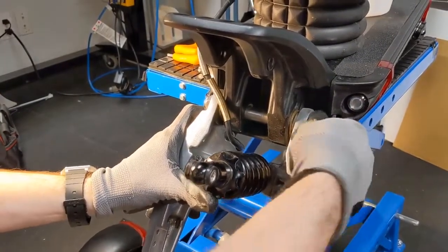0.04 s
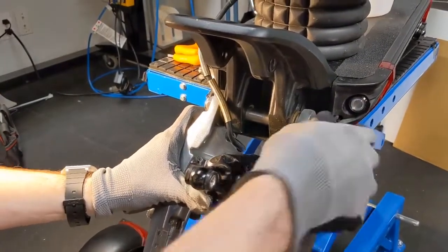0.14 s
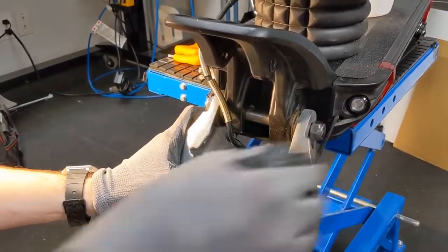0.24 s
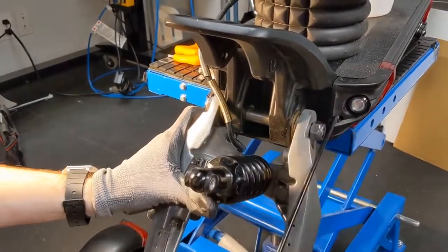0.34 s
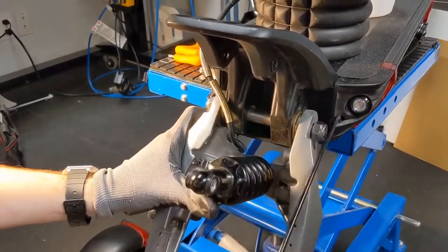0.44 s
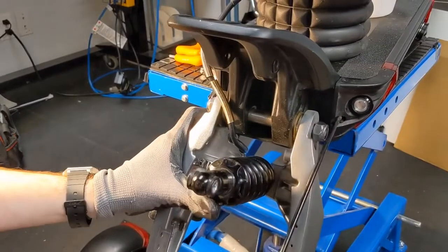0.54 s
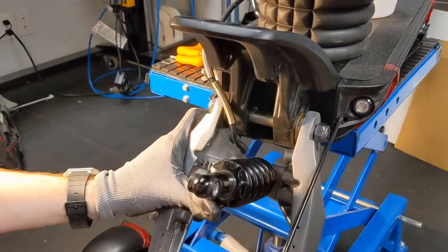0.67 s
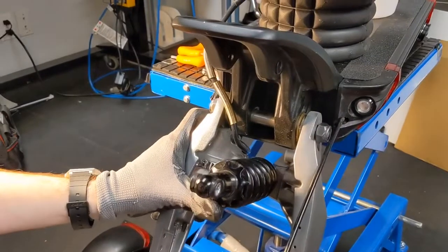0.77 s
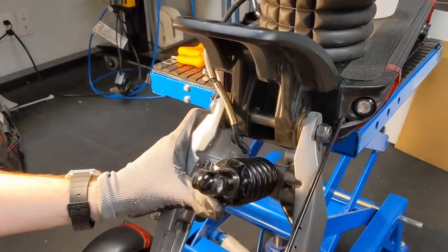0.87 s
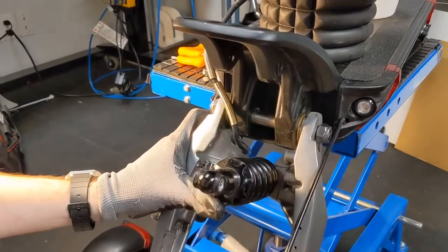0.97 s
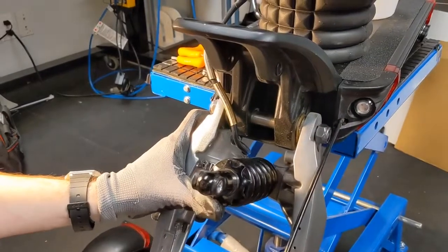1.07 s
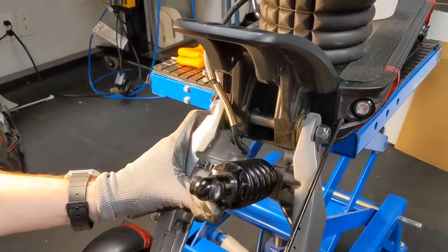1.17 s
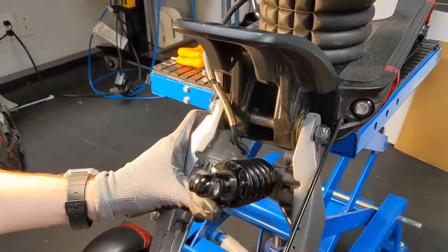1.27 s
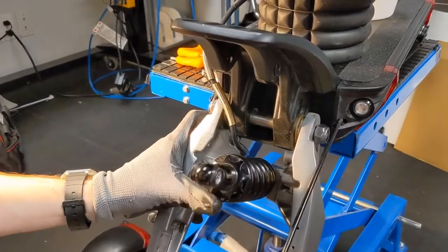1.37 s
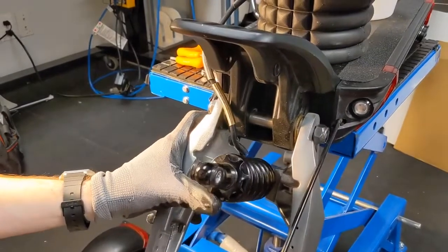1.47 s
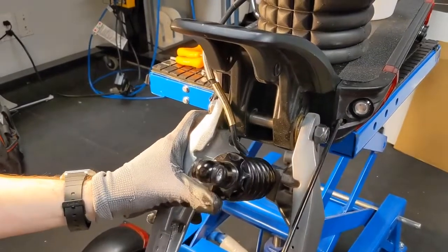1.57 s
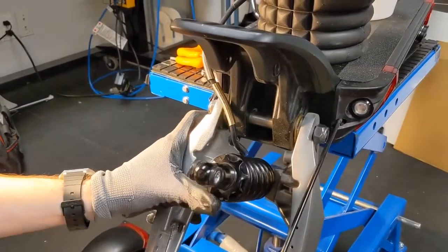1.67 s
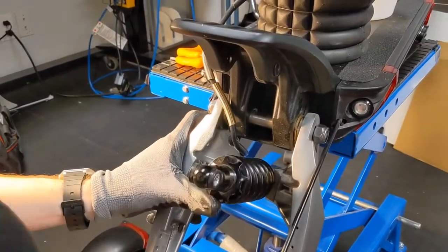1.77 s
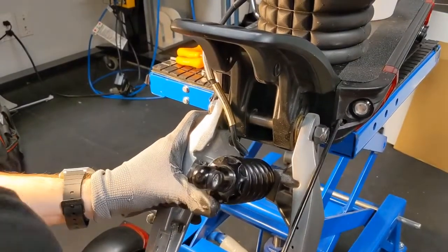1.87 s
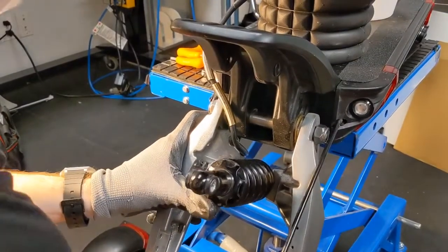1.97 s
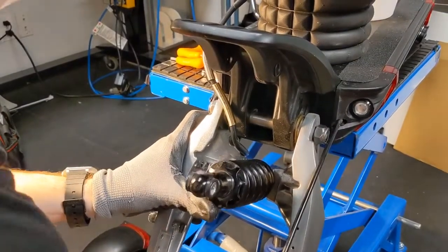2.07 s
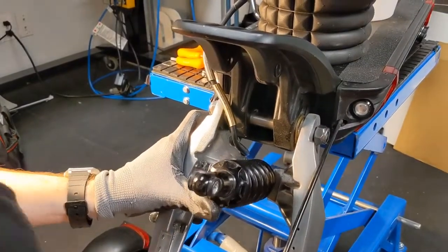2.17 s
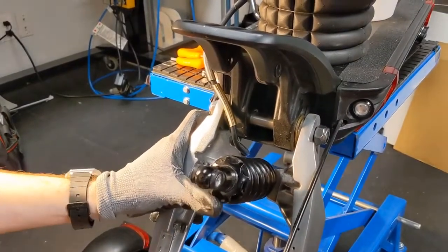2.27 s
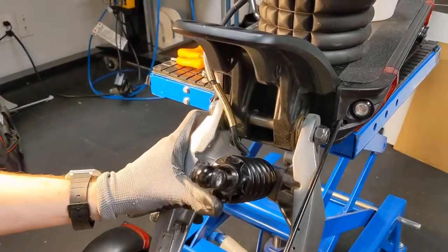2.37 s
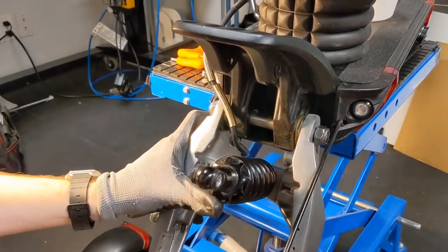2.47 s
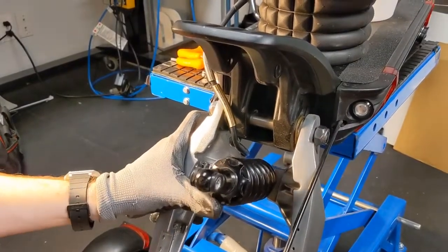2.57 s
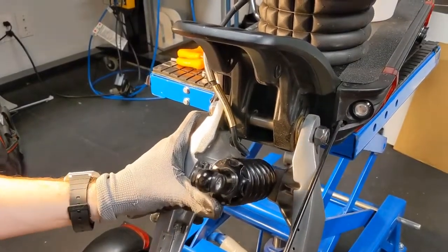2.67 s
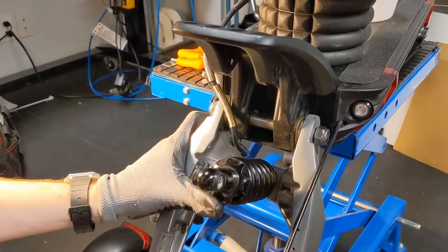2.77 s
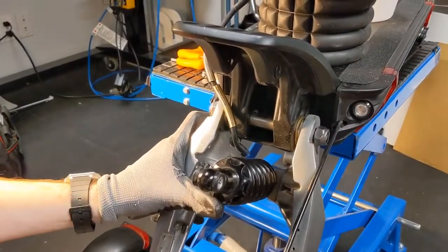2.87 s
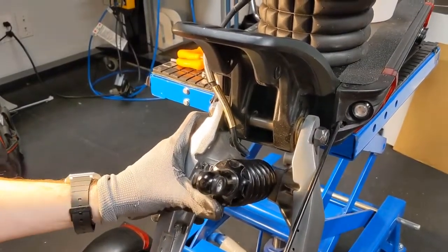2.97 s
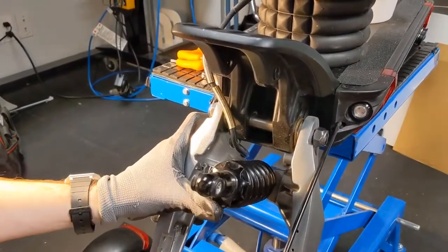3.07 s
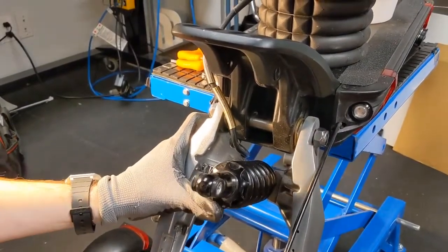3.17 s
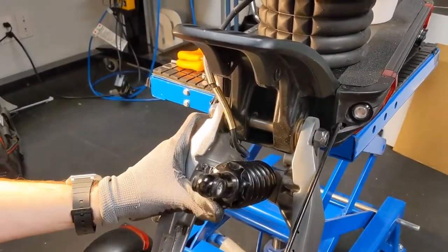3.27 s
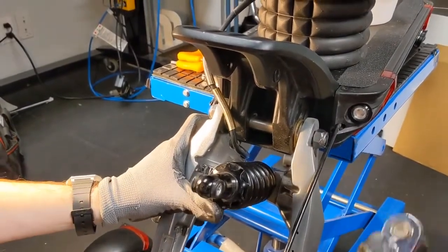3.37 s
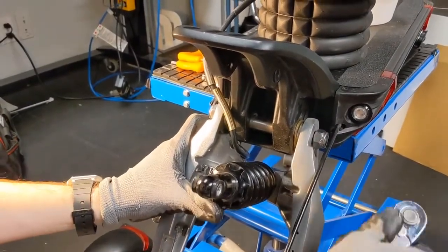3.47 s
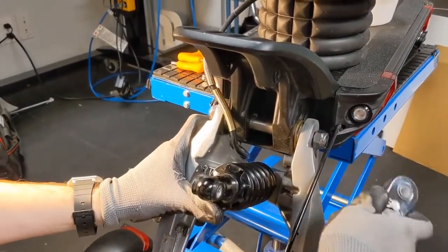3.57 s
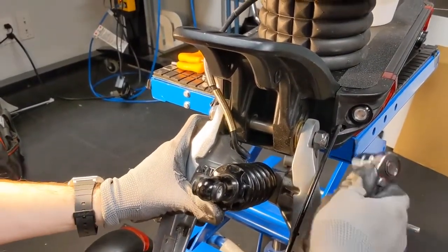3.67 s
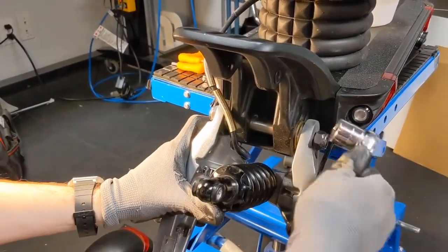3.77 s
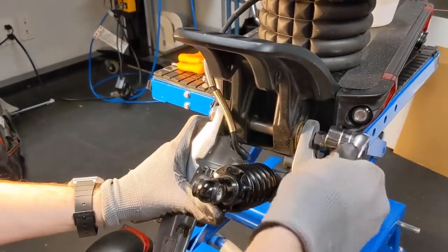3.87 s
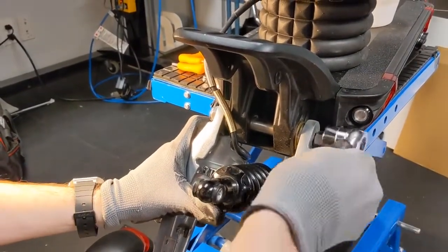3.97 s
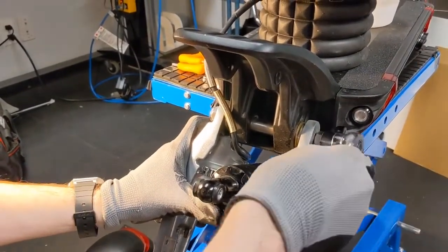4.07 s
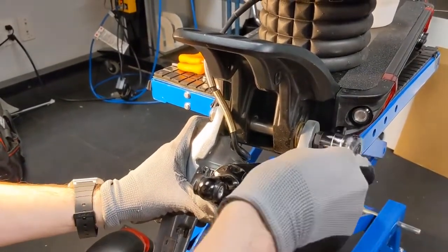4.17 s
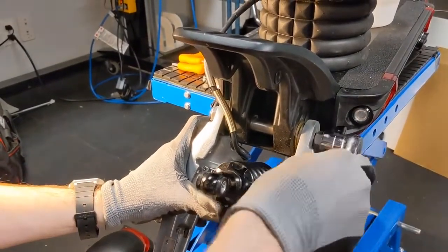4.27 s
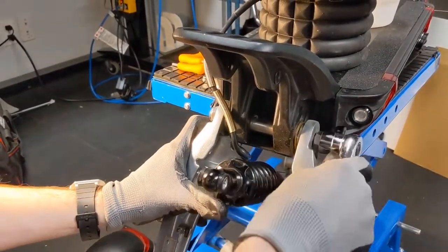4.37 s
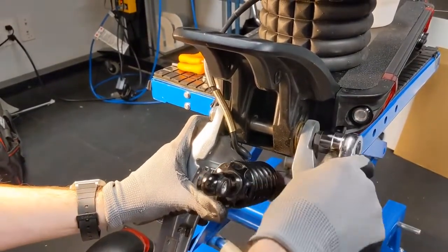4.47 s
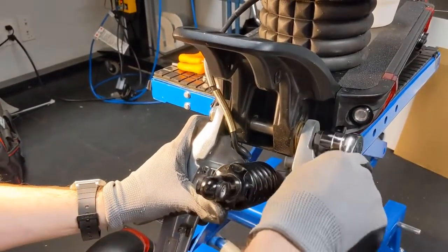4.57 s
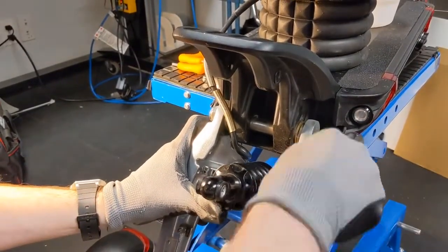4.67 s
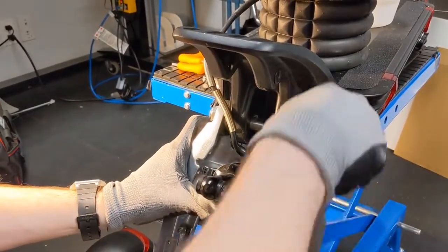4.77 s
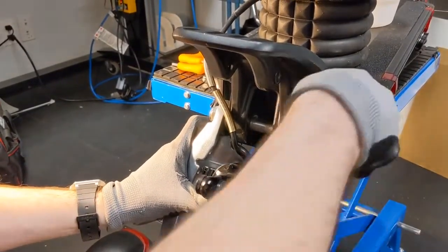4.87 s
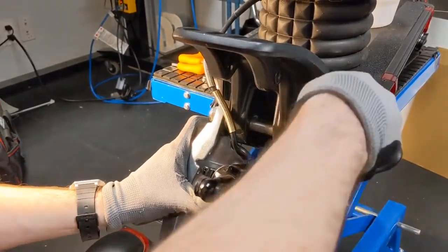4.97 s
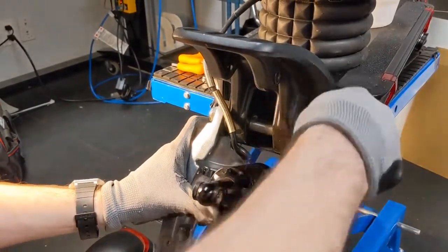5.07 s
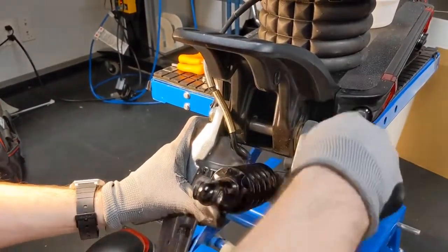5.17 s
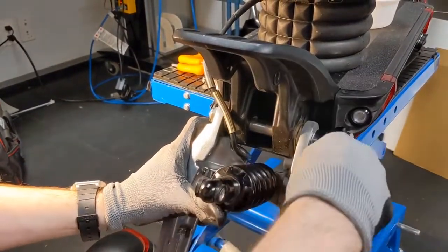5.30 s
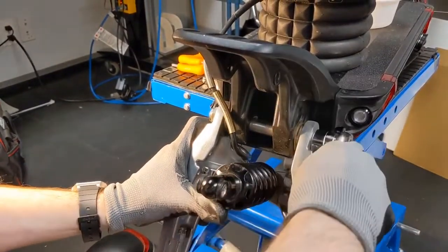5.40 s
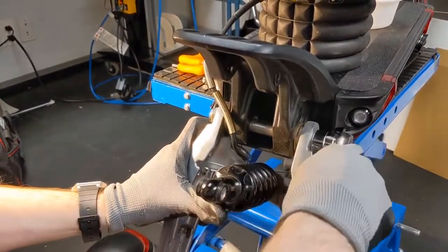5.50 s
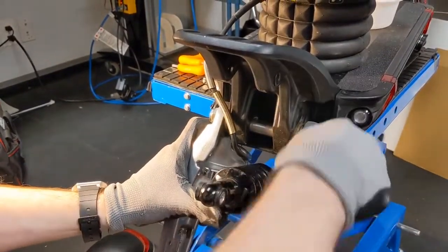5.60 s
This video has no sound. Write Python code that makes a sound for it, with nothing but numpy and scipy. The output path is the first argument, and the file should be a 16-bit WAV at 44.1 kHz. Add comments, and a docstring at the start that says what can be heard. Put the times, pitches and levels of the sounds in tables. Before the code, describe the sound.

A workshop fan hums low and steady throughout. For the first half, knitted gloves rub softly, a sleeve swishes once, and parts knock faintly in the hand, with a crisp ratchet tick at about two seconds. Then a socket lands on a nut with a bright snap, followed by uneven clusters of clicks, steel clacks, short scrapes and rattles. Close stereo pickup in a lightly reverberant room.

```python
"""Throughout, a workshop fan hums as a few wavering sinusoids over the filtered noise of room air.
First gloves and a sleeve rustle as swelling noise, and parts in the hand knock softly as resonant bursts.
A socket ratchet ticks, then lands on a nut of a steel frame: a noisy snap and a few damped modes.
It is worked round: bursts and ringing modes click and clack, and random slips scrape, rattle and jostle steel.
The walls answer all but the fan, by convolution with decaying noise."""
import sys
import numpy as np
from scipy import signal
from scipy.fft import rfft, irfft, next_fast_len
from scipy.io import wavfile
from scipy.ndimage import map_coordinates

SR = 44100
rng = np.random.default_rng(int(sys.argv[2]) if len(sys.argv) > 2 else 0)


def inscribe(sig):
    """Save sig as 16-bit PCM at rate SR to the path in sys.argv[1].

    A 1-D sig is mono; a 2-D sig holds one channel per row.
    Samples are clipped to [-1, 1] before scaling.
    """
    pcm = np.round(np.clip(np.atleast_2d(sig).T, -1, 1) * 32767)
    wavfile.write(sys.argv[1], SR, pcm.astype(np.int16))


N = 248724
TOP_HZ = 15650  # upper limit of the band


def amp(db):
    """Level in decibels as an amplitude ratio."""
    return 10 ** (np.asarray(db) / 20)


def unit(x):
    """Normalisation to an rms of 1."""
    return x / np.sqrt(np.mean(x ** 2) + 1e-20)


def fade(t, t60):
    """Exponential decay, 60 dB down at t60."""
    return np.exp(-np.log(1000) * t / max(t60, 1e-4))


def along(points, hz):
    """Interpolation of (frequency_hz, value) points on a logarithmic frequency axis."""
    point_hz, values = np.transpose(points)
    return np.interp(np.log(hz + 1), np.log(point_hz), values)


def wobble(rate, size=N):
    """Smooth random modulation: a spline through random knots, rate of them a second."""
    knots = rng.standard_normal(int(size * rate / SR) + 4)
    return map_coordinates(knots, [np.arange(size) * rate / SR])


def filtered(x, response):
    """Linear filtering: the spectrum of x times a response of frequency."""
    m = next_fast_len(N + SR // 2)
    spectrum = rfft(x, m) * response(np.fft.rfftfreq(m, 1 / SR))
    return irfft(spectrum, m)[..., :N]


def impulse(gain_db, size=1024):
    """Minimum phase: folding the cepstrum gives the causal pulse of a given spectrum."""
    cepstrum = irfft(gain_db(np.fft.rfftfreq(size, 1 / SR)) * np.log(10) / 20)
    cepstrum[1:size // 2] *= 2
    cepstrum[size // 2 + 1:] = 0
    return irfft(np.exp(rfft(cepstrum)))


def mid_side(hz):
    """Interchannel coherence: shares of common and opposite sound at the two microphones."""
    # likeness of left and right: frequency_hz, correlation
    likeness = [(60, 0.9), (200, 1), (500, 0.8), (1200, 0.04), (4000, 0.02), (12000, 0.03)]
    turn = np.arccos(np.clip(along(likeness, hz), -1, 1)) / 2
    return np.array([np.cos(turn), np.sin(turn)])


def rush(spectrum):
    """Diffuse noise of rms 1: alike in the bass, nearly unrelated in the treble."""
    noise = rng.standard_normal((2, N))
    mid, side = filtered(noise, lambda hz: amp(along(spectrum, hz)) * mid_side(hz))
    return unit(np.array([mid + side, mid - side]))


def bell(hz, centre_hz, q):
    """A broad resonance in dB, 0 at its centre."""
    detuning = q * (hz / centre_hz - centre_hz / (hz + 1))
    return -20 * np.log10(1 + detuning ** 2)


def ringing(modes, t, scatter_db):
    """Modal superposition: damped sines, their strengths and phases differing between microphones."""
    out = 0
    for hz, db, t60 in modes:
        level = amp(db + scatter_db * rng.standard_normal((2, 1)))
        phase = 2 * np.pi * rng.random() + rng.random((2, 1))
        out = out + level * fade(t, t60) * np.sin(2 * np.pi * hz * t + phase)
    return out


def panned(x, pan_db):
    """Interaural level difference: left exceeds right by a further pan_db."""
    return x * amp([[pan_db / 2], [-pan_db / 2]])


def add(track, s, sound):
    """Superposition: mix a sound into the track at time s."""
    part = track[:, round(s * SR):][:, :sound.shape[1]]
    part += sound[:, :part.shape[1]]


def crack(t, touch_s, rebounds_db, shared=0.033, rattle_db=2.0, rattle_rate=450, clatter_t60_s=0.08):
    """Impact noise: a hard strike, then uneven rebounds of loose steel; energy of 10 ms at rms 1."""
    share = np.clip(shared, 0, 1)  # part of the noise power that both microphones have in common
    noise = np.sqrt(share) * rng.standard_normal(len(t))
    noise = noise + np.sqrt(1 - share) * rng.standard_normal((2, len(t)))

    def level(x):
        return x / np.linalg.norm(x, axis=1, keepdims=True)

    u = t / touch_s
    strike = level(noise * u * np.exp(-u))
    onset = 1 - np.exp(-(u / 2) ** 2)
    unevenness = amp(rattle_db * wobble(rattle_rate, size=len(t)))
    rebounds = level(noise * onset * unevenness * fade(t, clatter_t60_s))
    return level(strike + amp(rebounds_db) * rebounds) * np.sqrt(SR / 100)


def struck(burst, gain_db):
    """Source and filter: a burst given a colour that leaves its energy unchanged."""
    sound = signal.fftconvolve(burst, impulse(gain_db)[None], axes=1)[:, :burst.shape[1]]
    return sound * np.linalg.norm(burst) / np.linalg.norm(sound)


def grains(rate, centre_hz, spread, cycles, size_db, size=N):
    """Granular friction: a shower of tiny knocks at rms 1, each with its own pitch and strength."""
    rows = rng.standard_normal((int(rate * size / SR), 4))
    start = rng.integers(size, size=len(rows))
    hz = np.minimum(centre_hz * 2 ** (spread * rows[:, :1]), TOP_HZ)  # spread in octaves
    age = np.arange(SR // 100)  # samples since the knock
    turns = hz * age / SR
    strength = amp(size_db * np.tanh(rows[:, 1:2]))
    fading = strength * np.exp(-turns / cycles) * (1 - np.exp(-2 * turns))
    at = (start[:, None] + age).ravel()
    channels = []
    for phase in rows[:, 2:].T:
        knock = fading * np.sin(2 * np.pi * turns + phase[:, None])
        channels.append(np.bincount(at, knock.ravel(), size)[:size])
    return unit(np.array(channels))


def strokes(rows):
    """Gain of soft rubs: each swells and ebbs with the speed of the hand."""
    t = np.arange(N) / SR
    return sum(amp(db) * np.exp(-2 * ((t - s) / length) ** 2) for s, length, db in rows)


def slides(rows, attack_s, release_t60):
    """Gain of sliding friction: steel breaks loose quickly, holds and comes to rest."""
    t = np.arange(N) / SR
    gain = 0
    for s, hold, db in rows:
        rise = np.clip((t - s) / attack_s, 0, 1)
        rest = fade(np.maximum(t - s - hold, 0), release_t60)
        gain = gain + amp(db) * rise * rest
    return gain


def workshop(x, build_s=0.00087, near_db=4, near_t60=0.42, echo_grain_db=3, echo_rate=260):
    """Reverberation: strong returns from nearby steel, then a tail whose treble dies first."""
    # decay of the tail: frequency_hz, t60_s
    walls = [(200, 1), (700, 0.98), (2200, 1), (5000, 0.85), (10000, 0.59), (15000, 0.6)]
    hz, t, z = signal.stft(rng.standard_normal((2, SR * 3 // 4)), SR, nperseg=256)
    decay = np.array([fade(t, t60) for t60 in along(walls, hz)])
    mid, side = signal.istft(z * decay * mid_side(hz)[..., None], SR, nperseg=256)[1]
    t = np.arange(len(mid)) / SR
    tail = np.array([mid + side, mid - side])
    tail *= 1 - np.exp(-(t / build_s) ** 2)
    tail *= 1 + amp(near_db) * fade(t, near_t60)
    # early returns are the most uneven
    tail *= amp(echo_grain_db * wobble(echo_rate, size=len(t)) * fade(t, 0.4))
    return signal.fftconvolve(x, tail / np.linalg.norm(tail[0]), axes=1)


def fan(air_db=-55, pan_db=1.17, waver_rate=4, drift=0.24):
    """Periodic forcing: a three-bladed fan and mains hum give steady lines over the rush of room air."""
    # fan shaft, blade and mains lines: frequency_hz, level_db (rms), waver_db, left_lead_rad
    lines = [(59.4, -58.5, -1, 0.18), (117.7, -67, 8, 0.18), (173.8, -39.5, 0.85, 0.17), (236, -68, 7, .3)]
    # room air: frequency_hz, relative_density_db (per Hz)
    air_tone = [(20, -46), (35, -6.5), (55, -28), (80, -6.5), (140, -2), (200, -2.5), (300, -7.5),
                (450, -9.5), (750, -13.5), (1100, -20.5), (2500, -20), (7000, -30.5), (14000, -29),
                (16000, -39)]
    t = np.arange(N) / SR
    hum = np.zeros((2, N))
    for hz, db, waver_db, lead in lines:
        # a line that wavers in level also wanders in phase
        phase = 2 * np.pi * hz * t + drift * waver_db * wobble(waver_rate)
        level = np.sqrt(2) * amp(db + waver_db * wobble(waver_rate))
        hum += level * np.sin(phase + [[lead / 2], [-lead / 2]])
    return panned(hum, pan_db) + amp(air_db) * rush(air_tone)


def cloth(grain_db=1.5, grain_rate=250, room_db=-9):
    """Dry friction: knitted gloves and a sleeve rub as noise in fine, uneven grains."""
    # glove strokes, and one quick swish of the sleeve among them: middle_s, length_s, level_db
    glove_strokes = [(.16, 0.11, -51), (.367, 0.0076, -49.5), (.67, 0.29, -50), (.86, 0.073, -53.5),
                     (1.12, 0.25, -55), (1.25, 0.044, -49), (1.82, 0.35, -54.5), (1.975, 0.016, -52),
                     (2.35, 0.021, -48.5), (3.1, 0.12, -55.5), (3.25, 0.071, -46), (3.5, 0.13, -53)]
    sleeve_strokes = [(1.49, 0.041, -40)]
    # colour of glove and sleeve: frequency_hz, relative_density_db (per Hz)
    glove_tone = [(470, -33), (800, -9.5), (2210, -4), (2500, -9), (3340, -8.5), (7360, -11),
                  (14100, -10.5), (16000, 0)]
    sleeve_tone = [(590, -52), (1200, -19), (2000, -1), (3980, -2), (4900, -8), (6400, -3), (14100, -1),
                   (16000, -5.5)]
    rub = strokes(glove_strokes) * rush(glove_tone) + strokes(sleeve_strokes) * rush(sleeve_tone)
    rub *= unit(amp(grain_db * wobble(grain_rate)))
    return rub + amp(room_db) * workshop(rub)[:, :N]


def knocks(touch_s=0.00041, rebounds_db=-3, room_db=-8):
    """Resonant filtering of impacts: parts shift in the hand, some dull, some hollow and pitched."""
    # light knocks of the parts in hand: start_s, resonance_hz, q, level_db
    light_knocks = [(0.365, 2120, 2.1, -56.5), (0.767, 2540, 6, -54.5), (0.907, 1220, 3.7, -51.5),
                    (0.908, 2490, 7, -55), (1.195, 1320, 3.3, -57), (1.235, 1700, 4.4, -57.5),
                    (2.034, 616, 2.5, -51), (2.049, 860, 1.6, -42), (2.053, 2760, 3.8, -48)]
    out, t = np.zeros((2, N)), np.arange(SR // 4) / SR
    for s, centre_hz, q, db in light_knocks:
        burst = crack(t, touch_s, rebounds_db, shared=0.83)
        knock = struck(burst, lambda hz: bell(hz, centre_hz, q))
        add(out, s, amp(db) * (knock + amp(room_db) * workshop(knock)[:, :len(t)]))
    return out


def scuff(attack_s=0.004, release_t60=0.31, slip_db=-7.5, slip_rate=480, slip_hz=1250, spread=0.58,
          cycles=1.4, size_db=5, room_db=-7, pan_db=-1.0):
    """Stick and slip: the frame shifts in a dull scrape of uneven slips, each at its own pitch."""
    # jerks of the frame under the hand: start_s, hold_s, level_db
    jerks = [(5.031, 0.012, -34.5), (5.048, 0.006, -41), (5.071, 0.0096, -45), (5.12, 0.012, -44.5),
             (5.172, 0.012, -55)]
    # colour of the scrape: frequency_hz, relative_density_db (per Hz)
    scrape_tone = [(150, -15), (260, -11.5), (450, -9.5), (580, -1.5), (780, 1.5), (1200, -5.5),
                   (1520, -12.5), (1990, -5.5), (2750, -14), (4570, -16.5), (15000, -36.5)]
    slips = grains(slip_rate, slip_hz, spread, cycles, size_db)
    scrape = slides(jerks, attack_s, release_t60) * unit(rush(scrape_tone) + amp(slip_db) * slips)
    return panned(scrape, pan_db) + amp(room_db) * workshop(scrape)[:, :N]


def rattle(attack_s=0.008, release_t60=0.3, tick_rate=600, spread=0.22, cycles=8, size_db=7, room_db=-6):
    """Repeated impact: the loose socket chatters in dense, uneven ticks of scattered pitch."""
    # the loose socket shakes in its play: start_s, hold_s, level_db, centre_hz
    shakes = [(4.097, 0.019, -42, 2096), (5.243, 0.012, -47, 3580), (5.326, 0.069, -40, 5850)]
    out, t = np.zeros((2, N)), np.arange(SR // 2) / SR
    for s, hold, db, centre_hz in shakes:
        rise = np.minimum(t / attack_s, 1)
        shaking = amp(db) * rise * fade(np.maximum(t - hold, 0), release_t60)
        ticks = shaking * grains(tick_rate, centre_hz, spread, cycles, size_db, size=len(t))
        add(out, s, ticks)
        add(out, s, amp(room_db) * workshop(ticks))
    return out


def steel_scrapes(attack_s=0.0015, release_t60=0.25, slip_rate=170, slip_spread_db=4, hiss_db=-7,
                  room_db=-7, pan_db=-2):
    """Excitation of resonances: uneven slips of steel make the frame chatter, over a dry hiss."""
    # scrapes of steel, one leaving a faint chatter near 2 kHz: start_s, hold_s, level_db
    scrape_times = [(3.985, 0.095, -48.5), (4.082, 0.014, -38), (4.13, 0.083, -60.5), (4.738, 0.014, -39.5),
                    (4.803, 0.014, -48), (4.875, 0.026, -41.5), (5.228, 0.025, -39.5)]
    # colour of the hiss: frequency_hz, relative_density_db (per Hz)
    hiss_tone = [(200, -1.5), (650, -10), (1000, -16), (1450, -13), (2000, -27), (2600, -17), (3400, -26),
                 (4400, -10), (7000, -15), (11000, -35), (16000, -42)]
    # resonances that the slips excite: frequency_hz, width_hz, relative_level_db
    resonances = [(622, 56, 1.5), (1716, 60, 4.5), (2060, 44, 5.5), (2120, 62, 3), (2330, 140, 1),
                  (2830, 190, -5.5), (3860, 210, -28)]
    slips = (rng.random(N) < slip_rate / SR) * amp(slip_spread_db * rng.standard_normal((2, N)))

    def body(f):
        response = 0
        for k, (hz, width, db) in enumerate(resonances):
            damping = 1j * f * width
            response = response + (-1) ** k * amp(db) * damping / (hz ** 2 - f ** 2 + damping)
        return response

    chatter = unit(filtered(slips, body))
    scrape = slides(scrape_times, attack_s, release_t60) * unit(chatter + amp(hiss_db) * rush(hiss_tone))
    return panned(scrape, pan_db) + amp(room_db) * workshop(scrape)[:, :N]


def seating(room_db=-33, lag_s=0.000224, grate_db=-25, grate_pan_db=-9, grate_room_db=-9, rebounds_db=-4,
            grip_s=0.06, snap_s=0.00032):
    """Damped free vibration: the ratchet lands with a grating snap and clinks until the glove stills it."""
    # the tool drops onto the nut: start_s, clink_level_db
    landing = (3.8117, -23)
    # the ratchet's modes as it lands: frequency_hz, relative_level_db, t60_s, pan_db (left over right)
    ratchet_modes = [(1100, -8, 0.045, -9), (1382, 2.5, 0.14, -10), (4200, 6, 0.005, -16),
                     (5170, 12, 0.005, -14), (10950, 11, 0.005, -9), (14595, -2, 0.11, 9)]
    # the grating snap: frequency_hz, relative_gain_db
    grate_tone = [(200, -25), (2500, -15.5), (3800, -9), (5200, -1), (6500, -8.5), (8000, -22),
                  (9600, -6.5), (11000, 0.5), (12500, -22), (15000, -15.5)]
    out, t = np.zeros((2, N)), np.arange(SR // 4) / SR
    s, db = landing
    heard = np.maximum(t - np.array([[lag_s], [0]]), 0)  # the left microphone is the farther one
    clink = 0
    for hz, mode_db, t60, pan_db in ratchet_modes:
        envelope = (1 - np.exp(-hz * heard)) * fade(heard, t60)
        mode = amp(db + mode_db) * envelope * np.sin(2 * np.pi * hz * heard)
        clink = clink + panned(mode, pan_db)
    clink *= np.exp(-(t / grip_s) ** 4)  # the gloved hand presses it still
    grate = amp(grate_db) * struck(crack(t, snap_s, rebounds_db), lambda hz: along(grate_tone, hz))
    add(out, s, clink + panned(grate, grate_pan_db))
    add(out, s, workshop(amp(room_db) * clink + amp(grate_room_db) * grate))
    return out


def contacts(socket_db=-15.0, frame_pan_db=-2, tick_room_db=-8, frame_room_db=-6, frame_slower=1.57,
             ring_q=1.0, tick_q=0.7, clack_q=0.73):
    """Modal excitation: each contact ticks in the tool and clacks in the frame, its colour weighting the modes."""
    # steel contacts: start_s, tick_db, tick_centre_hz, tick_pan_db (left over right),
    # clack_db, clack_centre_hz, frame_ring_db (relative), rebounds_db (relative), tool_touch_s
    hits = [(2.0556, -29, 13800, 2, -59, 2800, 2, 7, 0.00072),
            (2.058, -32.5, 13800, -2, -67, 2800, -6, -11, 0.00052),
            (2.126, -37, 13000, 0, -72, 2800, -6, -4, 0.00079),
            (3.915, -40, 9200, 5, -38, 1320, -10, 14, 0.0012),
            (3.9226, -32.5, 5100, -11.5, -40.5, 1580, -14, -13, 0.0005),
            (3.926, -40, 4750, -15, -53, 1980, -12, -13, 0.00035),
            (3.9812, -33.5, 5370, -2, -31.5, 1950, -9, -3, 0.00072),
            (4.0349, -37, 5830, -4.5, -59, 2000, -8, -1, .0007),
            (4.055, -49, 9000, 2, -45.5, 2000, 6, 16, 0.0012),
            (4.083, -41, 6000, 2, -42.5, 2200, -4, 1, 0.00062),
            (4.0909, -30, 6800, -2, -27, 2300, -3, 0.5, 0.0008),
            (4.724, -47, 8000, -4, -46.5, 2000, 7, 16, 0.00069),
            (4.7365, -47, 3000, 4, -39, 2020, -9, -1, 0.00044),
            (4.7749, -28, 5480, -2, -31, 3200, -2, -2, 0.00041),
            (4.8007, -32, 3300, -4, -27.5, 1610, -1, 3, 0.00038),
            (4.8048, -43, 3300, -5, -32, 1460, -16, -5, 0.00047),
            (4.871, -31.5, 5100, 0, -31.5, 2020, -11, 5, 0.00094),
            (4.875, -37, 6700, 2, -30.5, 2340, -7, 9, 0.00058),
            (5.2279, -32.5, 10400, -5, -31.5, 1480, -9, 0, 0.00079),
            (5.2337, -32, 9500, 2, -36, 2420, -7, 1, 0.00032),
            (5.243, -46, 3500, 2, -39, 3600, 6, 7, .0006),
            (5.254, -40, 3500, 2, -38.5, 3620, 2, -1, 0.0011),
            (5.2614, -28.5, 9900, 0, -43, 2400, 0, 4, 0.00066),
            (5.268, -40, 9900, -1, -32, 2400, -11, 2, 0.00095),
            (5.3144, -17.5, 10500, -3, -28.5, 2770, -11, -1, 0.00025),
            (5.3151, -20.5, 5600, 4.5, -21, 2960, -5, -10, 0.00051),
            (5.317, -21, 10200, 1, -27.5, 1730, -0.5, 0, 0.0015),
            (5.4636, -28.5, 10200, -1, -44.5, 1980, 2, -3, 0.00054),
            (5.603, -44, 6730, -1, -38, 1460, -2, -5, 0.00095)]
    # colour shared by all contacts, and the clack's on top of it: frequency_hz, relative_gain_db
    steel_tone = [(100, -4), (450, 3), (700, 5), (1050, -6.5), (1480, -3.5), (2000, -3), (2600, -4),
                  (3550, 3), (4200, -2), (4900, -0.5), (5450, -5.5), (6100, -1.5), (7600, -11), (11000, 0),
                  (12800, -11), (15500, -4)]
    clack_tone = [(200, 14.5), (600, 5), (1200, 3.5), (2200, 0), (3500, -4), (5500, -11.5), (11000, -22.5)]
    # modes of the socket, and of the frame rung through the nut: frequency_hz, relative_level_db, t60_s
    socket_modes = [(5350, 11, 0.016), (5480, 6, 0.096), (9290, -8, 0.14), (10030, 4, .05),
                    (10780, 5, .035), (11030, 8, 0.035), (11250, 5, .035), (14620, -10, .14)]
    frame_modes = [(614, -2, 0.14), (790, -4.5, 0.085), (1254, -10, .04), (1760, -7, 0.08),
                   (1942, -2.5, 0.1), (2198, -8, 0.11), (2438, -13, .09), (2530, -11, 0.1), (2940, -11, .1),
                   (3325, -12, 0.09), (3545, -11, 0.08)]
    # the bass leans right, the highest treble left: frequency_hz, left_over_right_db
    lean = [(500, -1.5), (1200, 0), (8500, -2.5), (12000, 1.5)]
    out, t = np.zeros((2, N)), np.arange(SR // 4) / SR
    for s, tick_db, tick_hz, pan_db, clack_db, clack_hz, ring_db, rebounds_db, touch_s in hits:
        attack = 1 - np.exp(-(t / touch_s) ** 2)
        tick = struck(crack(t, touch_s, rebounds_db),
                      lambda hz: bell(hz, tick_hz, tick_q) + along(steel_tone, hz))
        modes = [(hz, db + socket_db + bell(hz, tick_hz, ring_q), t60) for hz, db, t60 in socket_modes]
        tick = amp(tick_db) * (tick + attack * ringing(modes, t, scatter_db=2))

        # the heavier frame yields more slowly
        burst = crack(t, frame_slower * touch_s, rebounds_db, shared=0.42)
        clack = struck(burst, lambda hz: bell(hz, clack_hz, clack_q) + along(clack_tone, hz)
                       + along(steel_tone, hz))
        modes = [(hz, db + ring_db + bell(hz, clack_hz, ring_q) / 2, t60) for hz, db, t60 in frame_modes]
        clack = amp(clack_db) * (clack + attack * ringing(modes, t, scatter_db=3))

        add(out, s, panned(tick, pan_db) + panned(clack, frame_pan_db))
        add(out, s, workshop(amp(tick_room_db) * tick + amp(frame_room_db) * clack))
    return filtered(out, lambda hz: amp(along(lean, hz) * [[.5], [-.5]]))


def scene():
    """Superposition of the fan, the cloth and all the steel."""
    return fan() + cloth() + knocks() + scuff() + steel_scrapes() + seating() + contacts() + rattle()


def record(dry):
    """Band limitation: a very steep low-pass at TOP_HZ."""
    return filtered(dry, lambda hz: 1 / np.sqrt(1 + (hz / TOP_HZ) ** 120))


dry = scene()
out = record(dry)
inscribe(out)
```